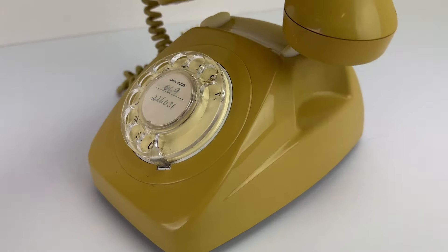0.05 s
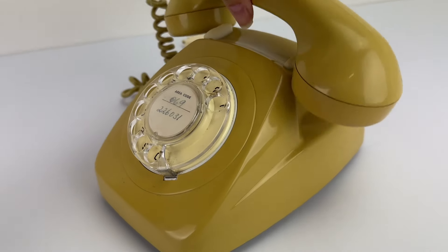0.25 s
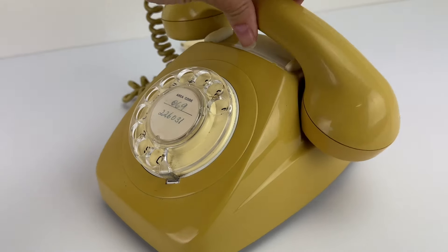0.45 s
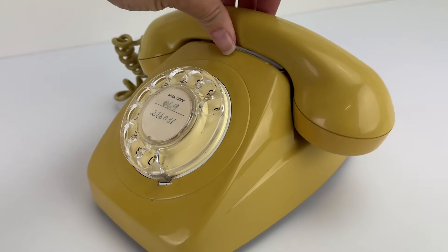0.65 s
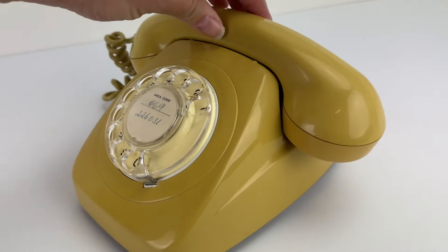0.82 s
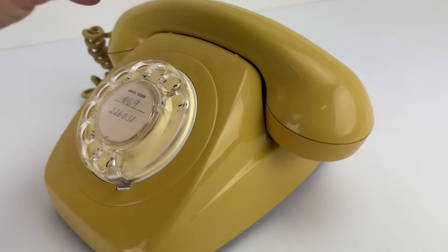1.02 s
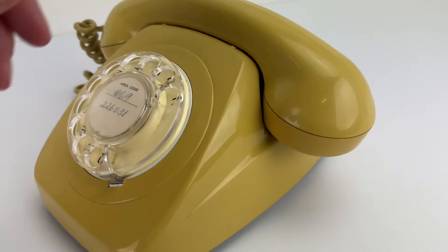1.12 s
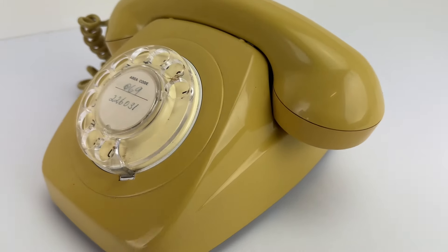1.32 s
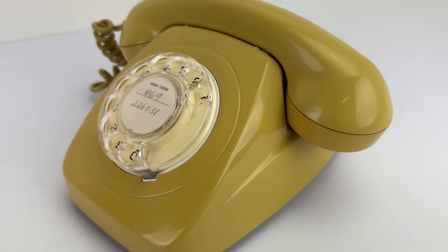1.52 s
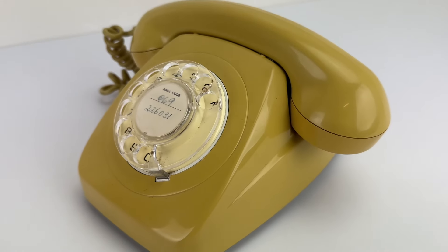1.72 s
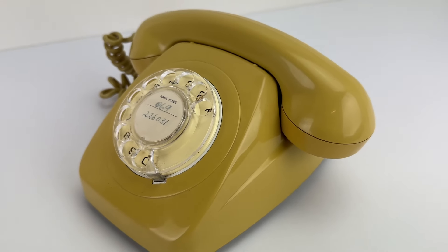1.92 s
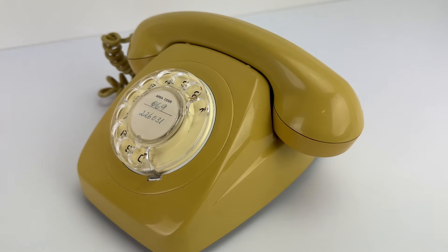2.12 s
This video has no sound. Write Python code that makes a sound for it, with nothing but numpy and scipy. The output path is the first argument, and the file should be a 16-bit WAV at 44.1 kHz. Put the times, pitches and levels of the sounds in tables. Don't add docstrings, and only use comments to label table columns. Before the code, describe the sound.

Telephone handset hung up: three hollow plastic clacks in quick succession, then near silence.

```python
import sys
import numpy as np
from scipy import signal
from scipy.fft import rfft, irfft, next_fast_len
from scipy.io import wavfile

SR = 44100
rng = np.random.default_rng(int(sys.argv[2]) if len(sys.argv) > 2 else 0)


def master_out(mix):
    frames = np.transpose(np.atleast_2d(mix))
    ceiling = np.clip(frames, -1, 1)
    pcm = np.round(ceiling * 32767).astype(np.int16)
    wavfile.write(sys.argv[1], SR, pcm)


def voltage_ratio(decibels):
    exponent = np.asarray(decibels, float) / 20
    return 10 ** exponent


N = 94815


def rms_one(x):
    return x / np.sqrt(np.mean(x ** 2) + 1e-20)


def at_hz(points, hz):
    table_hz, value = np.transpose(points)
    return np.interp(np.log(hz + 1), np.log(table_hz), value)


def decay(t, t60_s):
    return voltage_ratio(-60 * t / t60_s)


def swell(t, hz, rise_s, t60_s):
    return np.sin(2 * np.pi * hz * t) * (1 - np.exp(-t / rise_s)) * decay(t, t60_s)


def placed(rows, shape):
    out = np.zeros(N + SR)
    span = np.arange(int(0.5 * SR)) / SR
    for start_s, *rest in rows:
        first = int(start_s * SR) + 1
        t = span + first / SR - start_s
        out[first:first + len(t)] += shape(t, *rest)
    return out[:N]


def coloured(spectrum):
    hz = np.fft.rfftfreq(N, 1 / SR)
    inside = (hz > spectrum[0][0]) & (hz < spectrum[-1][0])
    white = rfft(rng.standard_normal(N))
    return rms_one(irfft(white * voltage_ratio(at_hz(spectrum, hz)) * inside, N))


def drift(rate_hz):
    lowpass = signal.butter(2, 16 * rate_hz, fs=SR, output="sos")
    slow = signal.sosfilt(lowpass, rng.standard_normal(N // 16 + 3000))[2990:]
    return np.interp(np.arange(N) / 16, np.arange(len(slow)), rms_one(slow))


def treble_of(x, edge_hz):
    return signal.sosfiltfilt(signal.butter(2, edge_hz, "high", fs=SR, output="sos"), x)


CONTACT_START_S = [.0655, .232, .2445, .2462, .2452, .258, .2685, .2712, .2800, .287, .4210, .4240, .432,
                   .451, .5856, .5891, .5933, .6040, .620, .650, .6700, .6710, .692, .718, .672, .2687,
                   .6095, .5930]
# boom_db, boom_hz, boom_length_s, crack_db
CONTACT_STRENGTHS = [(-38, 370, .008, -42.5), (-53, 330, 0.0015, -48.5), (-18.5, 1076, 0.004, -24),
                     (-8, 540, 0.009, -24), (-16, 380, 0.011, -25.5), (-26, 540, 0.0037, -27.5),
                     (-5, 542, 0.011, -14), (-20, 380, 0.007, -17), (-20, 700, 0.002, -28),
                     (-17.5, 545, 0.003, -32.5), (-15, 660, 0.004, -22.5), (-14, 545, 0.0032, -33.5),
                     (-23.5, 520, 0.0043, -31), (-32, 400, 0.0039, -34), (-21.5, 1190, 0.0034, -22.5),
                     (-8.5, 480, 0.002, -25), (-12, 480, 0.004, -21), (-11, 525, 0.0044, -23.5),
                     (-27.5, 490, 0.012, -36), (-28.5, 600, 0.019, -36), (-10.5, 732, 0.005, -16),
                     (-3, 537.5, 0.021, -24), (-23.5, 470, 0.012, -25.5), (-35, 530, 0.018, -39),
                     (-17.5, 380, 0.036, -39.5), (-20.5, 715, 0.002, -41), (-21.5, 490, 0.012, -42),
                     (-17, 700, 0.005, -38)]


def contacts():
    return np.column_stack([CONTACT_START_S, CONTACT_STRENGTHS])


def hollow_booms():
    def boom(t, boom_db, boom_hz, length_s, crack_db):
        damping = decay(np.maximum(t - length_s, 0), t60_s=0.018)
        return voltage_ratio(boom_db) * swell(t, boom_hz, rise_s=0.00051, t60_s=0.1) * damping

    return placed(contacts(), boom)


# start_s, level_db, pitch_hz
TABLE_THUDS = [(0.249, -21, 152), (.256, -28.5, 88.4), (.275, -29.5, 215.3), (.280, -26, 66.6),
               (.430, -29, 214.3), (.435, -27.5, 140), (.600, -28.5, 98), (.625, -32, 160), (.678, -19, 96),
               (.690, -25.5, 189), (.700, -24, 55)]


def table_thuds():
    return placed(TABLE_THUDS, lambda t, db, hz: voltage_ratio(db) * swell(t, hz, rise_s=0.0029, t60_s=0.146))


# pitch_hz, level_db, t60_s
SHELL_MODES = [(204.2, -6, 0.06), (376.4, -6, 0.069), (543.6, -21, 0.1), (747, -4.5, 0.027),
               (998.7, -5.5, 0.086), (1204.5, -1, 0.07), (1333, -9.5, 0.068), (1601.5, -6.5, 0.05),
               (1946, -16, .1), (2287, -18.5, 0.14), (2529, -19.5, 0.18), (2715, -8.5, 0.053),
               (3105, -14.5, 0.16), (3737, -22.5, 0.076)]


def shell():
    level_db, spread_db = -6.5, 3
    start_s, crack_db = contacts().T[[0, 4]]
    out = np.zeros(N)
    for hz, mode_db, t60_s in SHELL_MODES:
        chance, sign = rng.standard_normal((2, len(start_s)))
        strike = voltage_ratio(crack_db + mode_db + level_db + spread_db * chance) * np.sign(sign)
        clicks = np.full(N, 1e-18)
        clicks[(start_s * SR).astype(int)] = strike
        radius, angle = decay(1 / SR, t60_s), 2 * np.pi * hz / SR
        resonator = [1, -2 * radius * np.cos(angle), radius ** 2]
        out += signal.lfilter([0, np.sin(angle)], resonator, clicks)
    return out


# freq_hz, density_db_per_hz
CRACK_COLOUR = [(150, -47.5), (250, -15), (545, -6), (868, -23.5), (1210, -17.5), (1420, -24.5),
                (1600, -19.5), (9000, -47.5), (11700, -74), (19800, -120)]


def cracks():
    crack_level_db, chatter_db = -6, -9.5

    def snap(t, boom_db, boom_hz, length_s, crack_db):
        return voltage_ratio(crack_db + crack_level_db) * decay(t, 0.0503) * (1 - np.exp(-t / 0.0014))

    def rattle(t, boom_db, boom_hz, length_s, crack_db):
        return voltage_ratio(crack_db + crack_level_db + chatter_db) * decay(t, 0.054)

    chatter = placed(contacts(), rattle) * voltage_ratio(6.0 * drift(130))
    return coloured(CRACK_COLOUR) * (placed(contacts(), snap) + chatter)


# start_s, level_db, t60_s, extra_treble_db
EDGE_TICKS = [(.0648, -36, 0.0344, -19.5), (.0685, -51, 0.1, -15.5), (.2445, -30.5, 0.0244, 6),
              (.2685, -25, 0.0389, 2.5), (.4205, -39.5, 0.025, 3.5), (.4988, -31.5, 0.049, -4.5),
              (.5856, -21, 0.064, 2), (.6489, -31, 0.04, 0.5), (.6689, -20.5, 0.053, -2.5),
              (.674, -26, 0.13, -5.5), (1.296, -87, 0.039, 28), (1.825, -68, .03, -15.5)]
# freq_hz, density_db_per_hz
TICK_COLOUR = [(900, -9), (1500, 2), (2500, -0.5), (5000, -4.5), (8300, -5.5), (11000, -4.5), (14000, -6.5),
               (16500, -9)]


def ticks():
    grain = coloured(TICK_COLOUR) * voltage_ratio(2.3 * drift(400))
    treble = treble_of(grain, edge_hz=7000)
    body_env = placed(EDGE_TICKS, lambda t, db, t60_s, _: voltage_ratio(db) * decay(t, t60_s))
    treble_env = placed(EDGE_TICKS, lambda t, db, t60_s, extra_db: voltage_ratio(db + extra_db) * decay(t, t60_s))
    return (grain - treble) * body_env + treble * treble_env


# start_s, length_s, level_db, low_hz, high_hz
SCUFFS = [(0.268, 0.035, -47, 1500, 7560), (.28, .13, -60, 2000, 14500), (.525, .055, -53, 500, 3500),
          (0.535, 0.045, -52, 7000, 15000), (.505, 0.24, -57, 2500, 7200), (0.43, 0.075, -58, 1500, 14500),
          (0.575, 0.013, -56, 3000, 6000), (1.0, .78, -80, 8500, 14500), (.228, .02, -62, 1500, 5500),
          (.262, .07, -54, 12500, 15500), (.675, .07, -51, 12500, 15500), (.585, .06, -54, 12500, 15000),
          (.72, .10, -62, 10000, 14500), (.47, .09, -54, 500, 1500)]


def slides():
    white = rng.standard_normal(N) * voltage_ratio(2 * drift(200))
    time_s = np.arange(N) / SR
    out = np.zeros(N)
    for start_s, length_s, level_db, low_hz, high_hz in SCUFFS:
        progress = np.clip((time_s - start_s) / length_s, 0, 1)
        band = signal.butter(2, [low_hz, high_hz], "band", fs=SR, output="sos")
        out += voltage_ratio(level_db) * np.sin(np.pi * progress) ** 2 * rms_one(signal.sosfilt(band, white))
    return out


# start_s, level_db, pitch_hz, t60_s
RINGS = [(.1535, -46, 2100, .012), (.283, -48, 4380, .2), (.4205, -33, 960, .06),
         (.451, -39, 1900, .08), (.479, -42, 1950, .06), (.489, -50, 3700, .04),
         (.503, -43, 2150, .06), (.601, -31, 1915, .1), (.619, -38, 2950, .06),
         (.669, -26, 5150, .025), (.675, -53, 2220, .5), (.729, -52, 4400, .1),
         (.649, -44, 3900, .03), (1.82, -62, 1500, .05), (.671, -24, 1222, .08),
         (.672, -27, 1665, .05), (.671, -31, 1005, .05), (.671, -34, 2540, .1),
         (.269, -23, 1595, .05), (.269, -27, 1180, .06), (.269, -30, 2228, .08),
         (.270, -33, 2545, .08), (.269, -32, 1915, .1), (.272, -22, 255, .06), (.587, -32, 3680, .07),
         (.587, -35, 4230, .07), (.590, -27, 1206, .07), (.590, -28, 1044, .07),
         (.587, -33, 2580, .06), (.4988, -42, 3400, .04), (.4988, -40, 1930, .05),
         (.4205, -36, 2750, .04), (.621, -39, 1915, .12), (.4988, -44, 1250, .05)]


def rings():
    tones = placed(RINGS, lambda t, db, hz, t60_s: voltage_ratio(db) * swell(t, hz, 0.0012, t60_s))
    return tones * voltage_ratio(1.5 * drift(30)) * (1 + drift(90) / 5)


# freq_hz, left_lead_rad
PORT_LEAD = [(100, 0.17), (700, 0.24), (1400, .8), (2800, 1), (5600, 1.45), (9000, 0.63), (13000, 2.9)]
# freq_hz, left_minus_right_db
PORT_LEVEL = [(100, 0.22), (350, 2), (700, 1.14), (3000, 0.16), (14000, 0.3)]


def ports(x, lag_s=0):
    hz = np.fft.rfftfreq(N, 1 / SR)
    phase = at_hz(PORT_LEAD, hz) + 2 * np.pi * hz * lag_s
    half = voltage_ratio(at_hz(PORT_LEVEL, hz) / 2) * np.exp(.5j * phase)
    return irfft(rfft(x) * np.array([half, 1 / half]), N)


# freq_hz, t60_s
ROOM_DECAY = [(100, 0.91), (500, 0.3), (2500, 0.47), (5000, 0.43), (12000, 0.12)]


def room(x):
    size = next_fast_len(N + SR)
    hz = np.fft.rfftfreq(size, 1 / SR)
    t60_s = at_hz(ROOM_DECAY, hz)
    sides = [0, 0]
    for k, lag_s in enumerate(rng.uniform(.011, .042, 20)):
        loop = decay(lag_s, t60_s) * np.exp(-2j * np.pi * hz * lag_s)
        sides[k % 2] = sides[k % 2] + (-1) ** (k // 2) * loop / (1 - loop)
    tilt = voltage_ratio(-26.5 - 0.5 / (1 + (hz / 904) ** 2))
    width = 1 / (1 + (1200 / (hz + 1)) ** 2)
    pair = sides[0] + width * sides[1] * [[1], [-1]]
    return irfft(rfft(x, size) * tilt * pair, size)[:, :N]


# freq_hz, left_right_correlation
PORT_LIKENESS = [(60, 1), (240, 0.39), (950, 0.24), (3770, 0.21), (15000, 0.25)]


def floor(spectrum, patchy_db):
    hz = np.fft.rfftfreq(N, 1 / SR)
    mid, side = rfft(rng.standard_normal((2, N))) * voltage_ratio(at_hz(spectrum, hz))
    alike = np.clip(at_hz(PORT_LIKENESS, hz), 0, 1)
    pair = np.sqrt(1 + alike) * mid + np.sqrt(1 - alike) * side * [[1], [-1]]
    bottom_hz, top_hz = spectrum[0][0], spectrum[-1][0]
    edges_hz = bottom_hz * 2 ** np.arange(0, np.log2(top_hz / bottom_hz) + .5, .5)
    out = np.zeros((2, N))
    for low_hz, high_hz in zip(edges_hz, edges_hz[1:]):
        band = irfft(pair * ((hz >= low_hz) & (hz < high_hz)), N)
        out += voltage_ratio(patchy_db * drift(18)) * band
    return rms_one(out)


# freq_hz, density_db_per_hz
RUMBLE_COLOUR = [(20, -65.5), (28, -34), (53, -13.5), (75, -2.5), (108, -4.5), (126, -12.5), (449, -22),
                 (1500, -40), (2800, -50), (3400, -58), (8800, -120)]


def rumble():
    return voltage_ratio(-46.5) * floor(RUMBLE_COLOUR, patchy_db=1.5)


# freq_hz, density_db_per_hz
HISS_COLOUR = [(2500, -35), (3500, -8), (6000, -9.5), (9000, -13.5), (11500, -5.5), (16000, -16.5)]


def hiss():
    return voltage_ratio(-81) * floor(HISS_COLOUR, patchy_db=0)


def scene():
    handset = hollow_booms() + table_thuds() + shell() + cracks() + ticks() + slides()
    ringing = rings()
    direct = ports(handset) + ports(ringing, lag_s=-.00005)
    return direct + room(handset + ringing) + rumble() + hiss()


def top_cut(x):
    return signal.sosfilt(signal.butter(12, 16660, fs=SR, output="sos"), x)


# low_hz, high_hz, depth_db
PORT_NOTCHES = [(9287, 9899, 25), (12035, 13100, 35.5), (14700, 16000, 19)]


def record(dry):
    mirrored = np.concatenate([dry, dry[:, ::-1]], axis=1)
    hz = np.fft.rfftfreq(2 * N, 1 / SR)
    colour_db = np.zeros(len(hz))
    for low_hz, high_hz, depth_db in PORT_NOTCHES:
        offset = np.abs(2 * hz - low_hz - high_hz) / (high_hz - low_hz)
        colour_db -= depth_db / (1 + offset ** 6)
    notched = irfft(rfft(mirrored) * voltage_ratio(colour_db) * (hz < 16660), 2 * N)[:, :N]
    limit = 1.15
    return top_cut(limit * np.tanh(notched / limit))


dry = scene()
out = record(dry)
master_out(out)
```